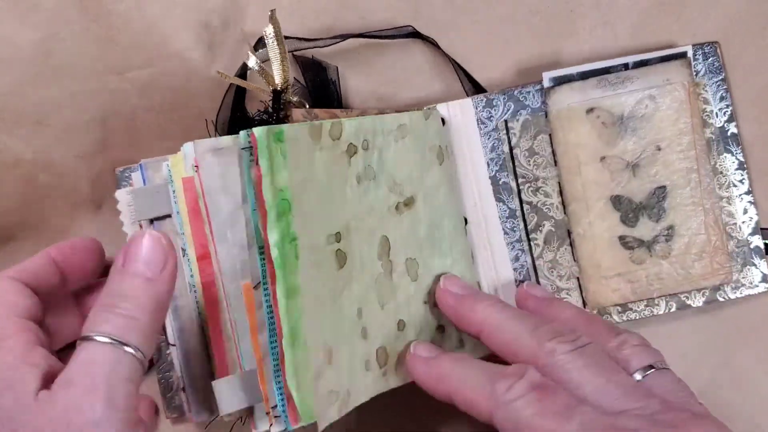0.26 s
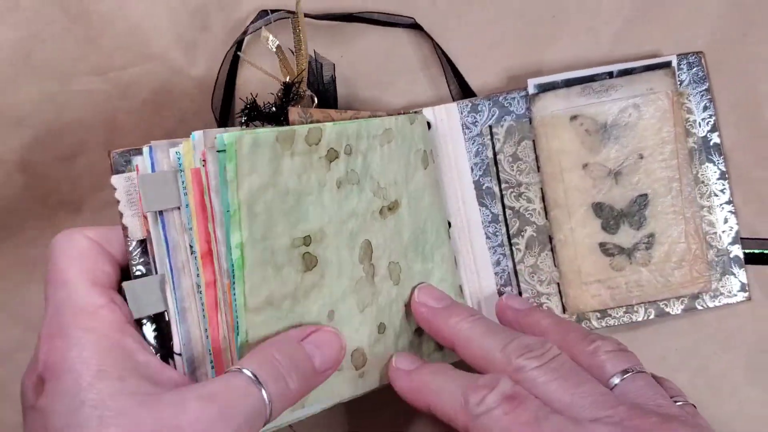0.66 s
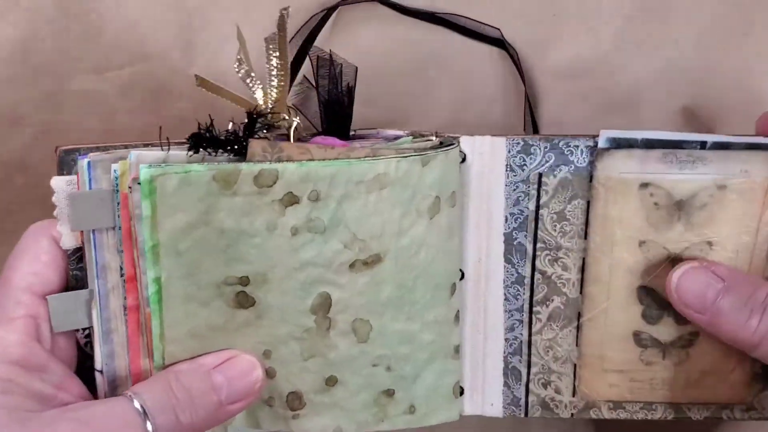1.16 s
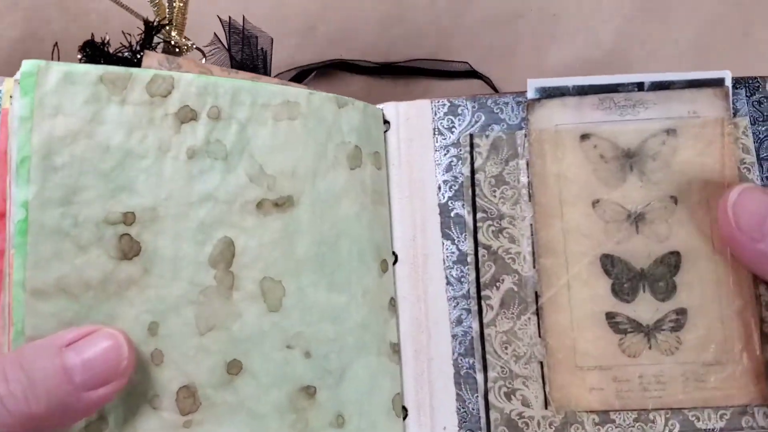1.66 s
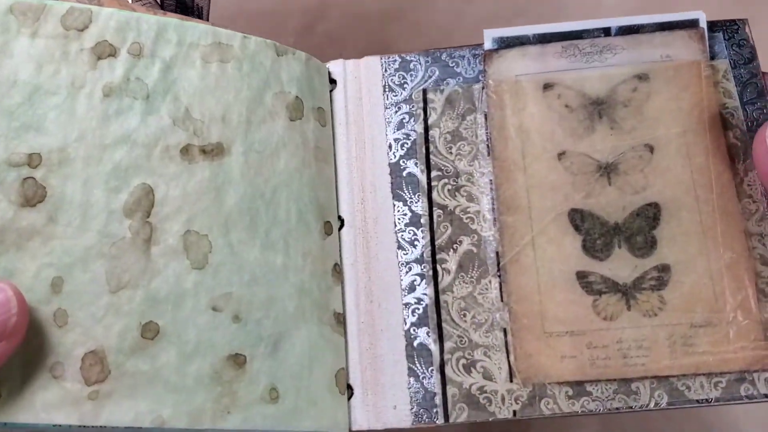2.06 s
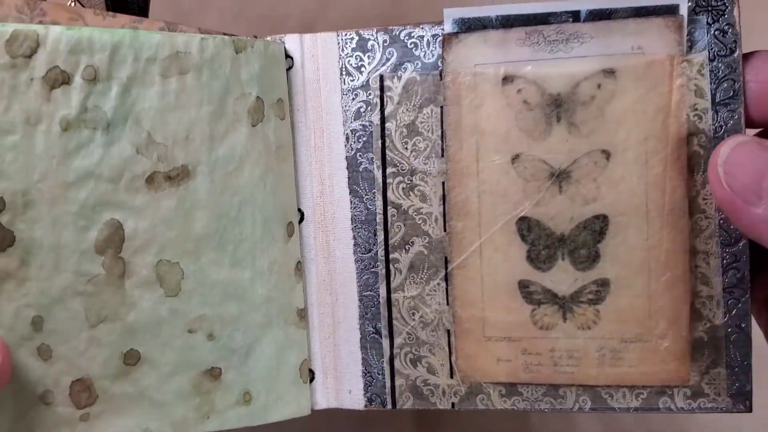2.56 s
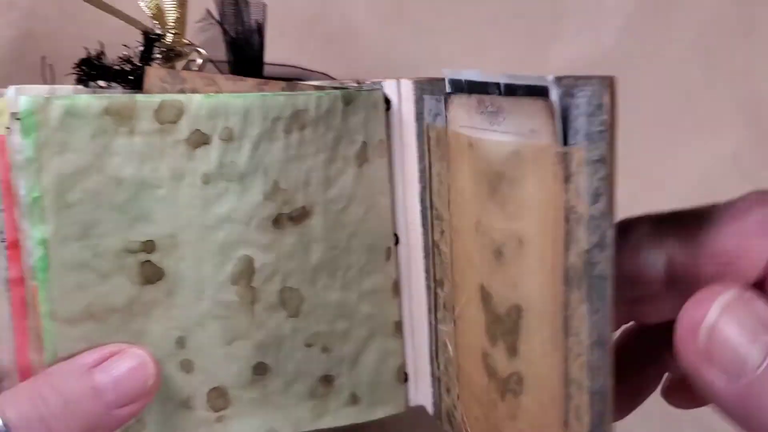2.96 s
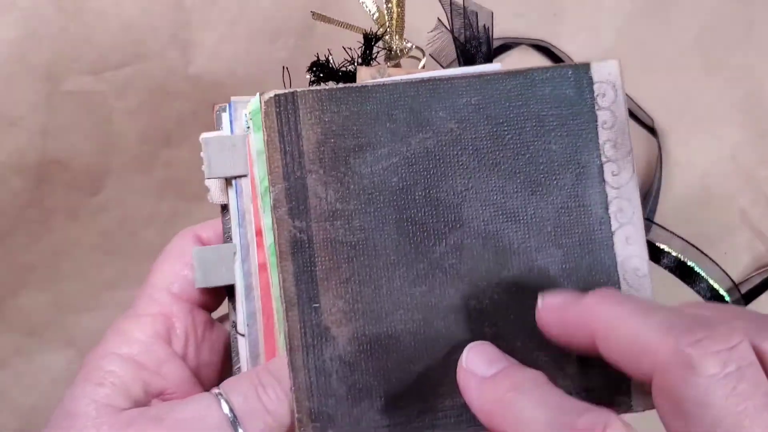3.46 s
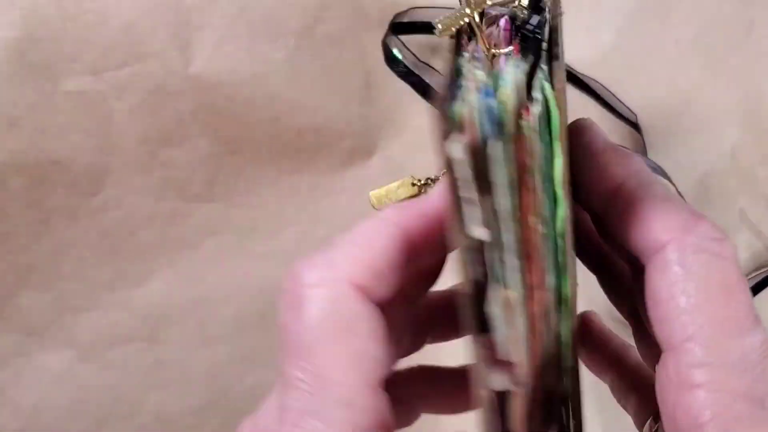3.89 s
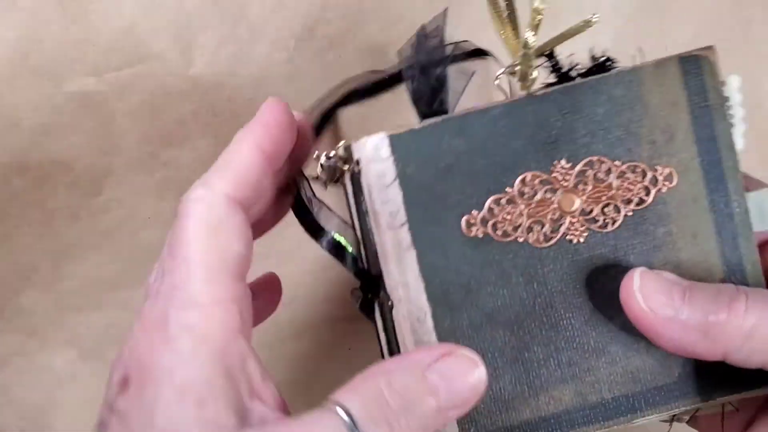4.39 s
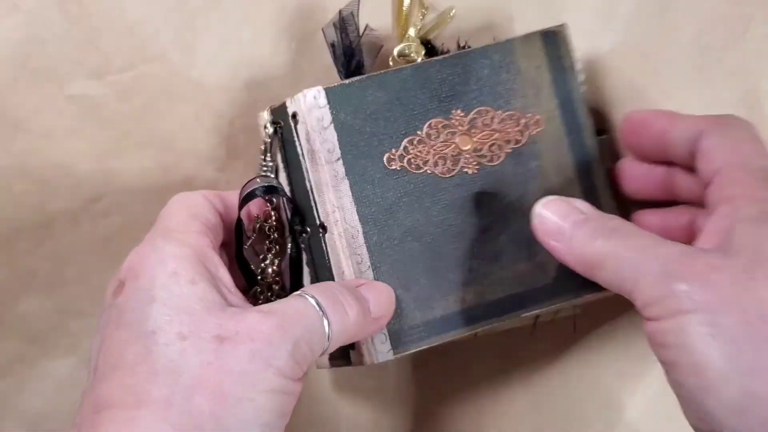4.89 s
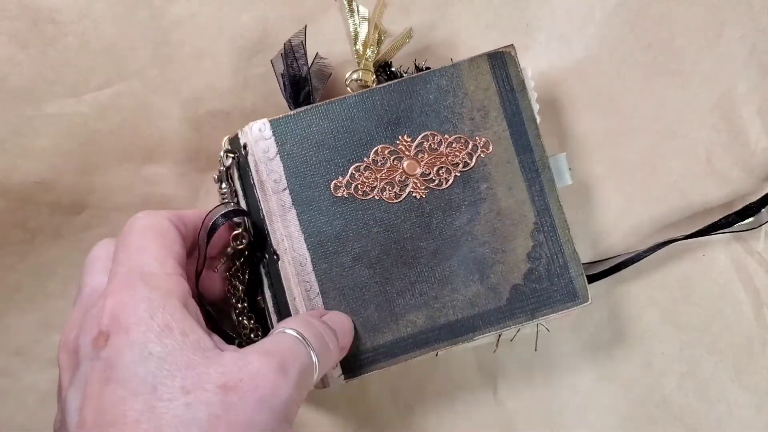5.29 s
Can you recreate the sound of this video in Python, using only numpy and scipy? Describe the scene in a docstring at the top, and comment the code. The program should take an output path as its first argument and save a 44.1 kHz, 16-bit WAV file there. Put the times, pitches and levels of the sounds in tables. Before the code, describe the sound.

Hands turn and smooth a crinkly page of a small handmade book, shut its cover, turn it over and set it down with a clap.

```python
"""Paper and skin rub: a page of a small handmade book is turned and smoothed; slides hiss or slip and pop.
Creases snap with short rings, brief scuffs sing, fingers brush a pocket, the cover is shut, the book turned over.
Bumps thud and ring the table's modes; the board edge lands in a run of claps that ring the cover.
A last push scrapes over the table paper in judders. Beneath lie low, uneven room air and a wavering hum."""
import sys
import numpy as np
from scipy import signal
from scipy.fft import rfft, irfft
from scipy.io import wavfile
from scipy.ndimage import uniform_filter1d

SR = 44100
rng = np.random.default_rng(int(sys.argv[2]) if len(sys.argv) > 2 else 0)


def inscribe(sig):
    """Save sig as 16-bit PCM at rate SR to the path in sys.argv[1].

    A 1-D sig is mono; a 2-D sig holds one channel per row.
    Samples are clipped to [-1, 1] before scaling.
    """
    pcm = np.round(np.clip(np.atleast_2d(sig).T, -1, 1) * 32767)
    wavfile.write(sys.argv[1], SR, pcm.astype(np.int16))


N = 244310
TIME_S = np.arange(N) / SR
BINS_HZ = np.fft.rfftfreq(N, 1 / SR)
EDGE_HZ = 16000

# Likeness of the two microphones. Each row: frequency in Hz, likeness 0-1.
ALIKE = [(25, 0.5), (70, 0.97), (130, 0.94), (290, 0.77), (640, 0.27), (1400, 0.28), (3000, 0.14),
         (7000, 0)]
# Spectrum of room air. Each row: frequency in Hz, relative level per Hz in dB.
AIR_COLOUR = [(20, -33), (38, -12), (55, -4.5), (80, 4), (100, -3.5), (150, -3), (200, -6), (320, -18),
              (600, -16.5), (1000, -20.5), (2000, -33.5), (4400, -39), (8000, -47), (16000, -63)]
# Hum partials. Each row: frequency in Hz, rms level in dB before the left-right balance.
HUM_PARTIALS = [(75.4, -64), (121, -72), (147, -70), (603, -82)]
# Spectra of rubbed paper: board body, sheet rasp, fibre sheen.
# Each row: frequency in Hz, relative level per Hz in dB.
BODY_COLOUR = [(35, 0), (100, 4), (300, -2.5), (450, -2.5), (620, -1.5), (760, -1), (980, -2), (1300, 0),
               (1850, 1), (2400, -6), (3200, -9), (6000, -39)]
RASP_COLOUR = [(1200, -41), (2100, -1.5), (2700, -5.5), (3500, 0.5), (5000, -1), (6500, -8), (8500, -16),
               (14000, -46)]
SHEEN_COLOUR = [(3500, -45), (6000, -2.5), (7500, -3), (10000, -0.5), (13000, -1), (16000, -0.5)]
# Strokes of paper and skin: from 0 s the page is lifted, falls over and is smoothed; from 1.09 s fingers
# brush the pocket and shift grip; from 2.99 s the cover swings shut; from 3.67 s the book is turned over
# and slides through the hands; from 5.14 s it is straightened and let go.
# Each row: start in seconds, length in seconds, relative level in dB, swell from start to end in dB,
# ease-off time constant in seconds, body over rasp in dB, sheen over rasp in dB, roughness 0-1.
STROKES = [(0, 0.049, -58.5, -3, 0.06, -10, -2, 0.5), (0.097, 0.17, -54.2, 1, 0.012, -6, -2, 0.6),
           (0.28, 0.05, -65.5, 0, 0.02, -2, -3, 0.6), (0.337, 0.115, -59, -2, 0.018, -1, -3.5, 0.8),
           (0.534, 0.04, -55.3, 4, 0.08, -2.5, 0.5, 0.6), (0.696, 0.088, -55.5, -2, 0.053, -0.5, -1, 0.66),
           (0.835, 0.26, -56, -3.5, 0.045, -3, 1, 0.2), (1.091, 0.011, -48, 1, 0.0056, -23, 0, 0.18),
           (1.127, 0.14, -69.5, 15.5, 0.019, -5.5, 2.5, 0.2), (1.328, 0.082, -70, -4, 0.034, 1.5, -3, .4),
           (1.471, 0.13, -60.5, 7.5, 0.045, -6, 5.5, 0.6),
           (1.648, 0.15, -64.5, -10, 0.071, -3.5, -0.5, 0.73),
           (1.978, 0.082, -62.5, -2.5, 0.042, -4, -4, 0.23),
           (2.23, 0.091, -66.5, 0.5, 0.042, -4.5, -4.5, 0.3), (2.377, 0.13, -71, -4, 0.026, 2.5, -2.5, 0.6),
           (2.831, 0.034, -61, -2.5, 0.065, 1, -7.5, .2), (2.99, 0.037, -68, -3, 0.084, 0, 7, .03),
           (3.08, 0.24, -54, -7.5, 0.05, -1.5, -2.5, 0.06),
           (3.486, 0.054, -63.5, 0.5, 0.038, -4.5, -1.5, 0.13),
           (3.665, 0.13, -59.5, -1, 0.074, 1.5, -4.5, 0.28), (3.867, 0.12, -56, -4.5, 0.0097, -4, 0, 0.57),
           (4.022, 0.017, -63.5, 0, 0.006, -6, 7, .6), (4.035, 0.2, -54, 1.5, 0.042, -5, -3.5, 0.31),
           (4.352, 0.285, -51.3, 1.5, 0.028, -7.5, 0, .45), (4.7, 0.19, -51.8, 0.5, 0.035, -2, 0, 0.6),
           (4.879, 0.11, -53.5, 0.5, 0.041, 0.5, -1, 0.24), (5.14, 0.16, -63.5, 0, 0.085, 5, -1.5, .5),
           (5.398, 0.0078, -65.5, -7.5, 0.02, 3, 6.5, 0.34)]
# Hands just holding the book. One row: body, rasp, sheen, relative levels in dB.
RESTING_DB = [-73.5, -80.5, -86.5]
# Creases snapping and nails ticking. Each row: time in seconds, relative level in dB, ring in Hz,
# crack over ring in dB, energy share of the first spike 0-1, left over right in dB, scatter decay in ms.
SNAPS = [(0.0179, -44, 2160, -5, 0.6, 2, 1), (0.0403, -34, 3430, -4, 0.15, 4, 2),
         (0.0895, -27.5, 2840, -3, 0.03, 1, 1.8), (0.1298, -33.5, 2720, 0, 0.03, -4, 3),
         (0.144, -37, 9050, 6, 0.08, 0, 2.4), (0.2138, -27.5, 2950, -4.5, 0.15, 0.5, 1.6),
         (0.224, -41, 3200, 0, .3, 0, 1), (0.2593, -41, 6000, -4, .3, 0, 1),
         (0.267, -37, 6900, -5, 0.15, 0, 2), (0.335, -41, 1550, -3, 0.15, 0, 2.4),
         (0.3701, -41, 1390, -9, .6, -2, 1), (0.3895, -43, 1360, -10, .3, 0, 2),
         (0.414, -43, 3260, -1, .4, 0, 1), (0.4515, -37, 3030, 2, 0.25, -3, 1),
         (0.4716, -33.5, 3220, 0, 0.2, 0, 1), (0.5646, -40, 3530, -12, .2, -3, 1.5),
         (0.662, -44, 3310, -3, .4, 0, 1), (0.6852, -41, 2600, -8, .4, 0, 1),
         (0.6925, -41, 3230, -3, .3, 0, 1.2), (0.7015, -41, 3000, -3, 0.5, -3, 1),
         (0.7136, -37.5, 2120, -7, .4, -2, 1.2), (0.792, -41, 5000, -2, .3, 0, 1),
         (1.061, -40, 4900, -8, 0.3, -8, 1.5), (1.3312, -39, 6400, 14, .4, -1, 1.2),
         (1.3982, -44, 4500, 4, 0.3, 0, 1.2), (1.4693, -42, 6150, 2, 0.3, 0, 1.5),
         (1.5495, -32, 11500, -10, 0.25, -3, 1.5), (1.617, -30.5, 10600, -7, 0.02, 4, 2.4),
         (1.6758, -38, 3540, 2, 0.01, -1, 6), (1.7442, -42, 9800, -23, 0.2, -5, 2.4),
         (1.755, -40, 9800, -9, .1, 0, 2.4), (1.821, -48, 8900, -9, 0.4, 0, 1.5),
         (2.4407, -39.5, 8100, -3, 0.05, 1, 2.4), (3.458, -46, 1700, -7, 0.1, 0, 2.4),
         (3.61, -37.5, 3540, 22, 0.2, -1, 1.8), (3.8638, -23.5, 2850, 2, 0.07, 0, 1.8),
         (3.8945, -40, 2600, 0, .2, 0, 1.2), (3.908, -40, 2800, 0, .2, 0, 1.5),
         (3.924, -41, 2400, -3, .1, 0, 2.4), (4.3395, -36.5, 1540, 1, 0.1, 2, 2.4),
         (4.576, -37, 1650, 4, .2, 0, 1.5), (4.703, -32.5, 3400, -9, 0.1, -1, 3),
         (4.7295, -35, 3080, 0, .2, 0, 1.5), (4.7468, -32.5, 4050, -6, 0.08, -4, 3),
         (4.8185, -36, 3400, -4, .2, 0, 1.5), (4.926, -25, 3120, 1, 0.01, -2, 3.5)]
# Short strokes that catch and sing. Each row: start in seconds, length in seconds, relative level in dB,
# first frequency in Hz, last frequency in Hz, nominal width in Hz.
SCUFFS = [(0.093, 0.042, -52, 2900, 3100, 600), (0.135, 0.14, -60, 330, 370, 220),
          (0.136, 0.013, -49.5, 14000, 13500, 3000), (0.338, 0.082, -60.5, 1400, 1350, 450),
          (0.56, 0.0084, -47.5, 3580, 3500, 500), (0.71, 0.34, -60, 2150, 1950, 420),
          (0.8, 0.24, -59, 125, 125, 110), (0.943, 0.011, -50.5, 920, 690, 280),
          (1.06, 0.048, -56, 5200, 5500, 700), (1.09, 0.012, -53, 690, 685, 350),
          (1.549, 0.012, -50, 10800, 11500, 2200), (1.96, 0.11, -66, 3900, 4300, 1200),
          (2.379, 0.025, -61, 1470, 1460, 600), (2.472, 0.015, -59, 1900, 1790, 700),
          (3.633, 0.25, -62, 3480, 3350, 450), (3.86, 0.0063, -50, 2000, 2600, 1500),
          (2.76, 0.27, -65.5, 1780, 1830, 330), (2.815, 0.045, -63, 1750, 1800, 500),
          (3.06, 0.21, -55, 4400, 4750, 600), (3.445, 0.029, -54.5, 1510, 1954, 1141),
          (4.03, 0.1, -58, 3300, 3500, 600), (4.07, 0.07, -57, 5050, 5150, 400),
          (4.147, 0.09, -44, 2200, 2650, 1400), (4.373, 0.15, -57, 1900, 1750, 600),
          (4.44, 0.12, -55, 3900, 4900, 2000), (4.44, 0.22, -57, 135, 145, 160),
          (4.79, 0.055, -54, 7000, 7500, 6000), (4.861, 0.024, -44.5, 3300, 2900, 2400),
          (4.903, 0.16, -63.5, 1480, 1700, 600), (4.921, 0.014, -42, 2300, 4040, 2000),
          (5.29, 0.0075, -49.5, 1640, 1640, 1100)]
# The book bumping hands and table. Each row: time in seconds, relative level in dB, pitch of the shove in Hz,
# knock gain in dB.
BUMPS = [(0.365, -47.5, 147, -9), (0.943, -40.5, 129, -13), (1.09, -54, 152, -9), (2.815, -50.5, 136, -6),
         (3.454, -59, 200, 2.5), (4.161, -38, 102, -22), (4.3955, -44.5, 235, -2), (4.58, -38.5, 270, -9),
         (4.631, -52, 200, 5), (4.648, -53, 220, 6.5), (4.705, -47, 190, -1), (4.72, -51, 190, 3),
         (4.752, -46, 200, 5), (4.7586, -35.5, 140, -14), (4.859, -32, 140, -14), (4.866, -36.5, 235, -15),
         (5.22, -29.5, 128, -12), (5.236, -37, 125, -7.5), (5.29, -42, 150, -6.5), (5.388, -51, 225, -8)]
# Modes of the table. Each row: frequency in Hz, relative level in dB, t60 in seconds.
TABLE_MODES = [(76.1, 4.5, 0.31), (130.5, -0.5, 0.17), (157.1, -5, 0.48), (170.4, -13, 0.072),
               (229.3, 0.5, 0.13), (287, -26, 0.016), (330, -7, 0.18), (527, -10, 0.095)]
# Modes of the cover board. Each row: nominal frequency in Hz, relative level in dB, t60 in seconds.
BOARD_MODES = [(560, -19, 0.03), (714, -10, 0.04), (1055, -6, 0.025), (1470, -7, 0.036), (1910, -13, .03),
               (2740, -19, 0.027), (2860, -11, 0.033)]
# The board edge landing. Each row: time in seconds, relative level in dB, clap decay in ms, board gain in dB.
CLAPS = [(4.8577, -33, 1.2, -6), (4.86, -28, 3.6, -3), (4.8622, -30, 4.5, -9), (4.8675, -36, 3.5, -12),
         (4.872, -39.5, 7, -18)]
# Spectrum of the clap. Each row: frequency in Hz, relative level per Hz in dB.
CLAP_COLOUR = [(88, -31), (150, 0), (320, -19), (428, -27), (668, -9), (1660, -4), (2550, -5.5), (2980, -6),
               (6600, -19), (7710, -21), (15500, -26)]
# Judders of the push, catching and slipping. Each row: start in seconds, length in seconds, relative level in dB,
# board ring in Hz, ring over scrape in dB.
JUDDERS = [(5.1755, 0.009, -43.5, 1460, -6), (5.1875, 0.0085, -34.5, 1480, -2.5),
           (5.2015, 0.0045, -32, 1790, -6), (5.2115, 0.005, -35, 1850, -1.5),
           (5.2255, 0.009, -40, 1300, -7)]
# Spectrum of the push. Each row: frequency in Hz, relative level per Hz in dB.
PUSH_COLOUR = [(150, -11.5), (250, -11), (430, -19), (540, -12), (700, -17), (870, -15), (1100, -5),
               (1300, -6.5), (1780, -4.5), (2500, -7.5), (2950, -3.5), (3900, -5), (7200, -13.5),
               (15500, -23)]
# Narrow resonances of nearby surfaces. Each row: frequency in Hz, width in Hz, lift in dB.
NOOK = [(605, 110, 5), (1100, 50, 2), (1500, 140, 3.5), (1520, 30, -4), (1785, 50, 4), (1968, 67, 1),
        (2150, 37, -1.5), (2370, 27, -2), (2500, 400, -1.2), (4530, 60, 2)]

GRIP_SHARE = 0.85  # attack over release time constant of a stroke
# the even slide under the judders
PUSH_START_S, PUSH_LENGTH_S, PUSH_DB, PUSH_SWELL_DB = 5.189, 0.034, -38, -1
PUSH_ATTACK_S, PUSH_RELEASE_S = 0.0071, 0.015
JUDDER_ATTACK_S, JUDDER_RELEASE_S = 0.0009, 0.0028


def amp(db):
    """Decibels to gain."""
    return 10 ** (np.asarray(db) / 20)


def unit(x):
    """Scales to rms 1."""
    return x / np.sqrt(np.mean(x ** 2) + 1e-20)


def read(points, hz):
    """Reads a table along a log-frequency axis."""
    points_hz, value = np.transpose(points)
    return np.interp(np.log(hz + 1), np.log(points_hz + 1), value)


def tint(x, points):
    """Filters a sound by the spectrum of a table, to rms 1."""
    size = x.shape[-1]
    gain = amp(read(points, np.fft.rfftfreq(size, 1 / SR)))
    return unit(irfft(rfft(x) * gain, size))


def add(mix, start_s, sound):
    """Lays a stereo sound into the mix, cut at its end."""
    part = mix[:, round(start_s * SR):][:, :sound.shape[1]]
    part += sound[:, :part.shape[1]]


def drift(hz):
    """Slow chance of rms 1, rolled off above about hz."""
    return unit(irfft(rfft(rng.standard_normal(N)) / (1 + (BINS_HZ / hz) ** 4), N))


def noise(size, lag_ms=0.082):
    """White noise at two microphones: alike in the bass, unrelated in the treble, later on the right."""
    hz = np.fft.rfftfreq(size, 1 / SR)
    mid, side = rfft(rng.standard_normal((2, size)))
    alike = read(ALIKE, hz)
    mid, side = mid * np.sqrt(1 + alike), side * np.sqrt(1 - alike)
    later = np.exp(-2j * np.pi * hz * lag_ms / 1e3)
    return unit(irfft(np.array([mid + side, (mid - side) * later]), size))


def resonate(x, hz, width_hz):
    """A one-pole resonance of peak gain about 1 that can follow a frequency curve."""
    turn = np.exp(2j * np.pi * np.cumsum(hz * np.ones(x.shape[-1])) / SR)
    radius = np.exp(-np.pi * width_hz / SR)
    return 2 * (turn * signal.lfilter([1 - radius], [1, -radius], x / turn)).real


def background(air_db=-58.5, wander_cycles=0.25):
    """Uneven low rumble of room air, and hum partials that swell and waver in phase."""
    hum = np.zeros(N)
    for hz, db in HUM_PARTIALS:
        swell = unit(amp(3.5 * drift(hz=5)))
        cycles = hz * TIME_S + wander_cycles * drift(hz=2.63)
        hum += amp(db) * swell * np.sqrt(2) * np.sin(2 * np.pi * cycles)
    air = tint(noise(N) * amp(1.2 * drift(hz=6)), AIR_COLOUR)
    return (amp(air_db) * air + hum) * amp([[-.4], [.4]])


def stroke(start_s, length_s, swell_db, attack_s, release_s):
    """Gain of one slide: takes hold exponentially, swells or fades evenly in dB, eases off exponentially."""
    early_s = np.maximum(start_s - TIME_S, 0)
    late_s = np.maximum(TIME_S - start_s - length_s, 0)
    along = np.clip((TIME_S - start_s) / length_s, 0, 1)
    return amp(swell_db * (along - .5)) * np.exp(-np.minimum(early_s / attack_s + late_s / release_s, 20))


def effort():
    """Gains of body, rasp and sheen, and roughness: strokes add in power over the resting hands."""
    power = amp(RESTING_DB)[:, None] ** 2 * np.ones(N)
    rough_power = np.zeros(N)
    for start_s, length_s, db, swell_db, ease_s, body_db, sheen_db, rough in STROKES:
        voices = amp(db) * np.array([amp(body_db), 1, amp(sheen_db)])
        envelope = stroke(start_s, length_s, swell_db, GRIP_SHARE * ease_s, ease_s)
        part = (voices[:, None] * envelope) ** 2
        power += part
        rough_power += rough * part[1]
    return (*np.sqrt(power), rough_power / power[1])


def slips(per_s, spread_db, ring_ms, blur):
    """Stick-slip grains: each caught fibre lets go in a tiny dying burst, over a steady blur."""
    size = amp(spread_db * np.minimum(rng.exponential(1, N), 4))
    energy = size ** 2 * (rng.random(N) < per_s / SR)
    energy = signal.lfilter([1], [1, -np.exp(-1e3 / (ring_ms * SR))], energy)
    return unit(noise(N) * np.sqrt(energy / energy.mean() + blur))


def flex(x, patchy_db):
    """A bending sheet keeps changing its resonances, in patches some 500 Hz wide and 50 ms long."""
    z = signal.stft(x, nperseg=512, noverlap=384)[2]
    patches = rng.standard_normal(z.shape[1:])
    for _ in range(2):
        patches = uniform_filter1d(patches, size=5, axis=0)
        patches = uniform_filter1d(patches, size=15, axis=1)
    gain = unit(amp(patchy_db * unit(patches)))
    return signal.istft(z * gain, nperseg=512, noverlap=384)[1][:, :N]


def crinkle(per_s, spread_db, count=20):
    """Tiny wrinkles pop at random, each patch of paper with its own pitch."""
    out, ms = np.zeros((2, N)), np.arange(512) / SR * 1e3
    for hz in np.geomspace(1500, 11000, count):
        size = amp(spread_db * np.minimum(rng.exponential(1, N), 2))
        pops = (rng.random(N) < per_s / count / SR) * size
        pop = unit(resonate(noise(len(ms)) * np.exp(-ms / .5), hz, hz / 3))
        out += signal.oaconvolve(pops[None], pop, axes=1)[:, :N] / np.sqrt(hz)
    return unit(out)


def rubbing():
    """Slides drive board, sheet and fibres: flat faces hiss evenly, wrinkled ones slip and pop."""
    body_gain, rasp_gain, sheen_gain, rough = effort()
    slipping = slips(per_s=420, spread_db=3.1, ring_ms=.65, blur=.35)
    grains = np.sqrt(rough) * slipping + np.sqrt(1 - rough) * noise(N)
    bent = flex(grains, patchy_db=1.9)
    body = body_gain * tint(bent, BODY_COLOUR)
    rasp = amp(0.8) * tint(bent, RASP_COLOUR)
    sheen = sheen_gain * amp(1.45 + 1.2 * drift(hz=40)) * tint(grains, SHEEN_COLOUR)
    wrinkles = amp(-2.5) * rough * crinkle(per_s=80, spread_db=3.6)
    pressure_db = (.6 + 1.3 * rough) * drift(hz=55)
    return amp(pressure_db - 0.7) * (body + rasp_gain * (rasp + wrinkles) + sheen)


def snaps(gain_db=-21, ring_width_share=0.45):
    """A crease flips: a sharp spike, a brief ring of the paper, and a faint shiver of the sheet."""
    crack_colour = [(200, -3), (1300, -18), (2600, -2.5), (5500, 7), (9000, 2.5), (15000, -1.5)]
    out, ms = np.zeros((2, N)), np.arange(-64, 1984) / SR * 1e3
    shiver = amp(-19) * np.exp(-ms / 3.5)
    for s, db, hz, crack_db, sharp, left_db, decay_ms in SNAPS:
        scatter = noise(len(ms)) * (np.exp(-ms / decay_ms) + shiver) * (ms > 0)
        scatter /= np.linalg.norm(scatter, axis=1, keepdims=True)
        burst = np.sqrt(sharp) * (ms == 0) + np.sqrt(1 - sharp) * scatter
        crack = tint(burst, crack_colour)
        width_hz = ring_width_share * hz
        ring = unit(resonate(resonate(burst, hz, width_hz), hz, width_hz))
        sides = amp([[left_db / 2], [-left_db / 2]])
        add(out, s + ms[0] / 1e3, amp(db + gain_db) * sides * unit(ring + amp(crack_db) * crack))
    return out


def scuffs():
    """A brief stroke of stick-slip grains; the sheet's resonance moves as the contact travels."""
    out, grains = np.zeros((2, N)), slips(per_s=800, spread_db=3.5, ring_ms=0.7, blur=0.42)
    for s, length_s, db, first_hz, last_hz, width_hz in SCUFFS:
        part = grains[:, round(s * SR):][:, :round(length_s * SR)]
        along = np.linspace(0, 1, part.shape[1])
        hz = first_hz + (last_hz - first_hz) * along
        for _ in range(2):  # twice, for steep skirts
            part = resonate(part, hz, width_hz * np.sqrt(2))
        envelope = 1.09 * np.sqrt(abs(np.sin(np.pi * along)))
        add(out, s, amp(db) * envelope * unit(part))
    return out


def board(t, soft_hz):
    """The struck cover board rings briefly; a soft contact weakens its higher modes."""
    ring = np.zeros(len(t))
    for hz, db, t60_s in BOARD_MODES:
        gain = amp(db - 60 * t / t60_s) / np.sqrt(1 + (hz / soft_hz) ** 4)
        struck_hz = hz * (1 + .02 * rng.standard_normal())
        ring += gain * np.sin(2 * np.pi * struck_hz * t)
    return ring


def bumps(ring_db=-15, shove_db=-2, shove_decay_s=0.0041, thud_db=-2, thud_decay_s=0.008, board_db=-4, soft_hz=900):
    """Padded contact gives a low shove and a dull board knock; the book's weight rings the table."""
    thud_colour = [(40, -15), (120, 5.5), (280, -6.0), (700, -1.0), (1300, -23), (4000, -46)]
    out, t = np.zeros((2, N)), np.arange(SR // 2) / SR
    onset = 1 - np.exp(-t / 0.00055)
    ring = sum(amp(db - 60 * t / t60_s) * np.sin(2 * np.pi * hz * t) for hz, db, t60_s in TABLE_MODES)
    for s, db, shove_hz, knock_db in BUMPS:
        shove = np.sin(2 * np.pi * shove_hz * t) * np.exp(-t / shove_decay_s)
        thud = tint(noise(len(t)), thud_colour) * np.exp(-t / thud_decay_s)
        knock = amp(thud_db) * thud + amp(board_db) * board(t, soft_hz)
        bump = amp(ring_db) * ring + amp(shove_db) * shove + amp(knock_db) * knock
        add(out, s, amp(db) * onset * bump)
    return signal.sosfilt(signal.butter(3, 52, "high", fs=SR, output="sos"), out)


def landing(hard_hz=3500, blow_db=-7.5, blow_ms=0.17):
    """A corner touches, the board claps down and rings, the pages settle: each contact is one hard blow."""
    out, t = np.zeros((2, N)), np.arange(8192) / SR
    u = 1e3 * t / blow_ms
    blow = amp(blow_db) * (1 - u) * np.exp(-u)
    for s, db, decay_ms, board_db in CLAPS:
        clap = tint(noise(len(t)), CLAP_COLOUR) * np.exp(-1e3 * t / decay_ms)
        add(out, s, amp(db) * (blow + clap + amp(board_db) * board(t, hard_hz)))
    return out


def push(ring_width_hz=420):
    """The book scrapes over the table paper in quick judders, each of which rings the board."""
    slide = amp(PUSH_DB) * stroke(PUSH_START_S, PUSH_LENGTH_S, PUSH_SWELL_DB, PUSH_ATTACK_S, PUSH_RELEASE_S)
    grains = slips(per_s=1100, spread_db=2.0, ring_ms=.5, blur=.7)
    power, out, t = slide ** 2, np.zeros((2, N)), np.arange(2048) / SR
    for s, length_s, db, hz, ring_db in JUDDERS:
        force = amp(db) * stroke(s, length_s, 0, JUDDER_ATTACK_S, JUDDER_RELEASE_S)
        power += force ** 2
        ring = noise(len(t)) * (t < length_s)
        for _ in range(2):
            ring = resonate(ring, hz, ring_width_hz)
        add(out, s, amp(db + ring_db) * np.sqrt(length_s / t[-1]) * unit(ring))
    return out + np.sqrt(power) * tint(grains, PUSH_COLOUR)


def room(x, wet_db=-9, t60_s=0.084):
    """Nearby surfaces raise or dip a few narrow bands; the furnished room adds a short tail."""
    tail_colour = [(100, 11.0), (3000, 0), (7000, -0.5), (15000, 1.0)]
    lift_db = sum(db / (1 + (2 * (BINS_HZ - hz) / width_hz) ** 2) for hz, width_hz, db in NOOK)
    x = irfft(rfft(x) * amp(lift_db - 1.0), N)
    t = np.arange(SR // 3) / SR
    tail = tint(noise(len(t)), tail_colour) * amp(-60 * t / t60_s) * (t > .002)
    tail /= np.linalg.norm(tail[0])
    return x + amp(wet_db) * signal.fftconvolve(x, tail, axes=1)[:, :N]


def scene():
    """Paper, landing and push pass through the room; bumps and background join directly."""
    handling = rubbing() + snaps() + scuffs() + landing() + push()
    return room(handling) + bumps() + background()


def record(dry):
    """Low-pass at the recorder's band limit."""
    lowpass = signal.firwin(511, EDGE_HZ, window=("kaiser", 8), fs=SR)
    return signal.oaconvolve(dry, lowpass[None], "same")


dry = scene()
out = record(dry)
inscribe(out)
```